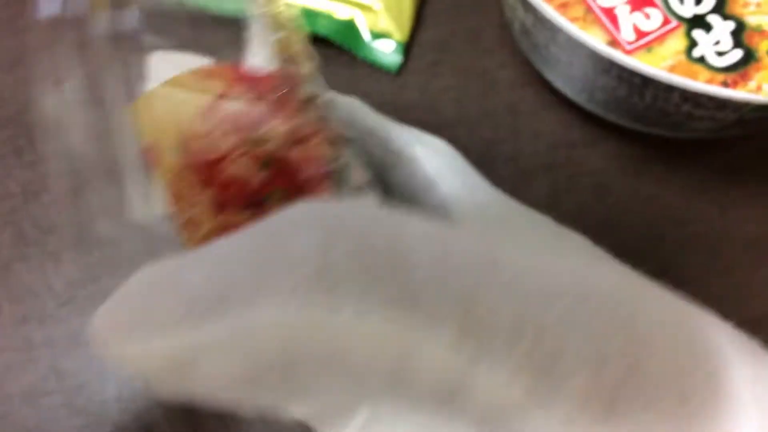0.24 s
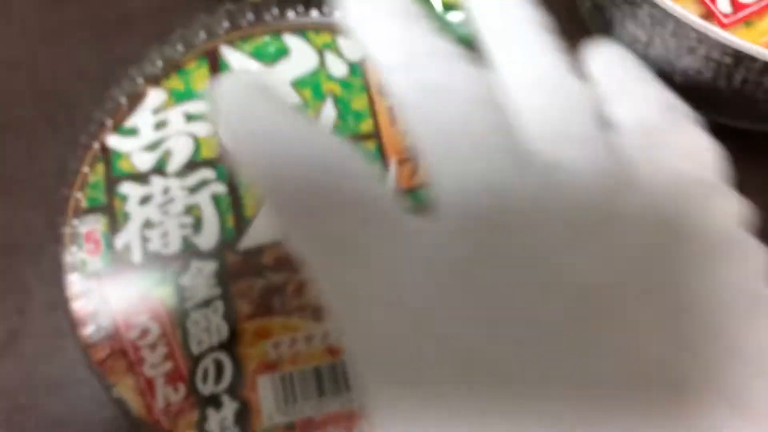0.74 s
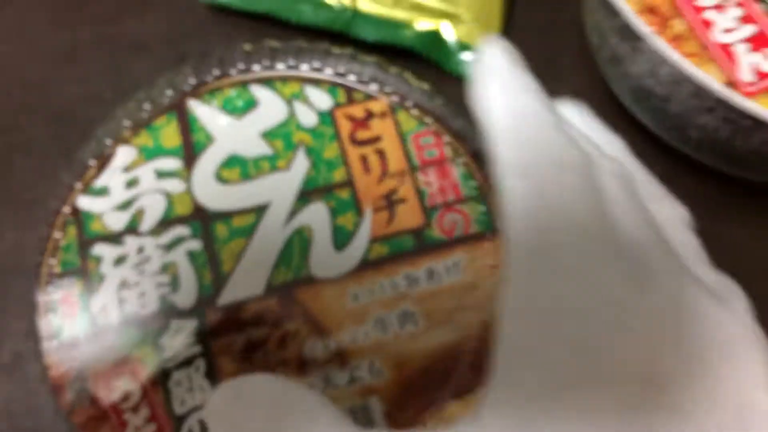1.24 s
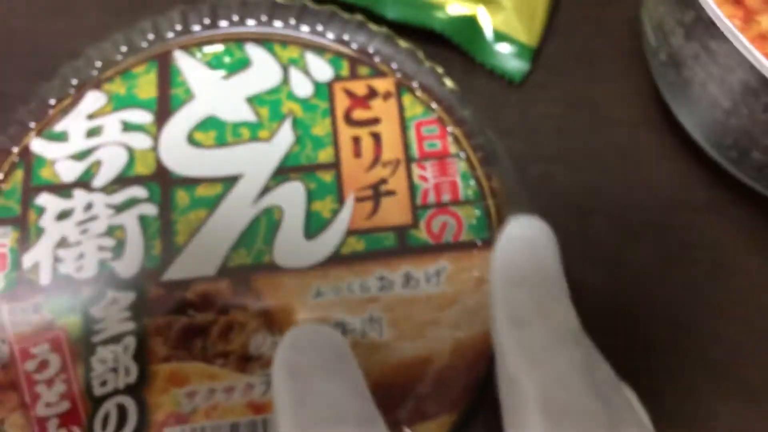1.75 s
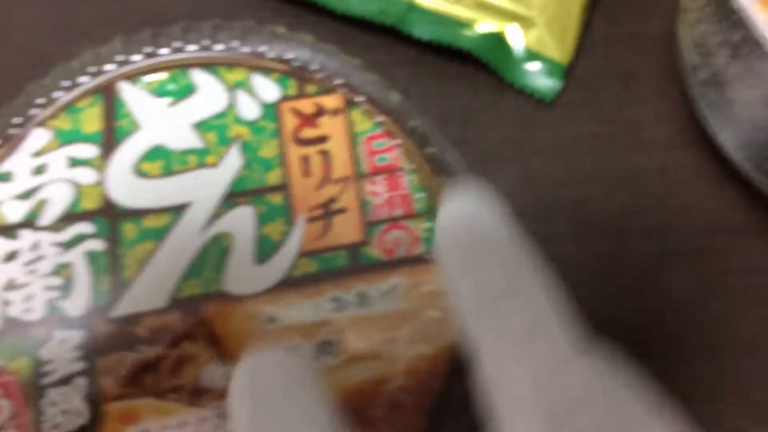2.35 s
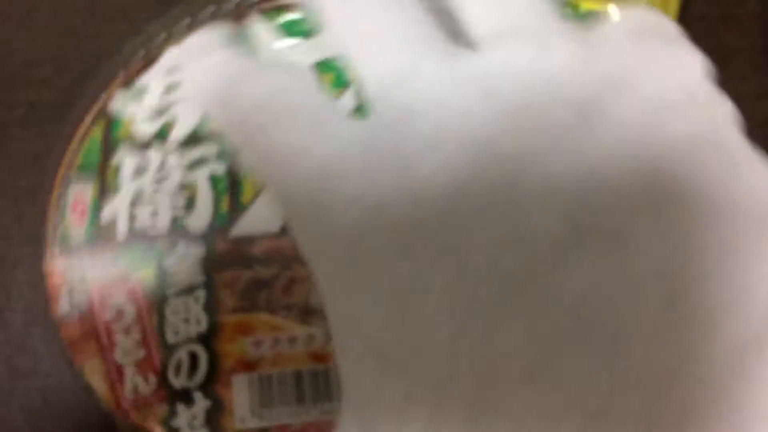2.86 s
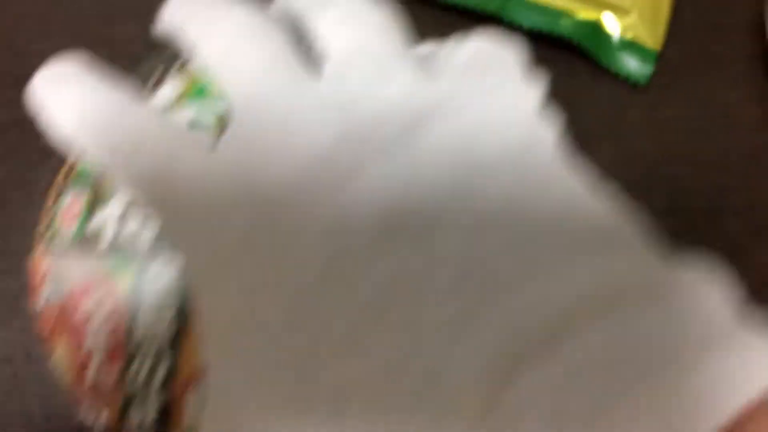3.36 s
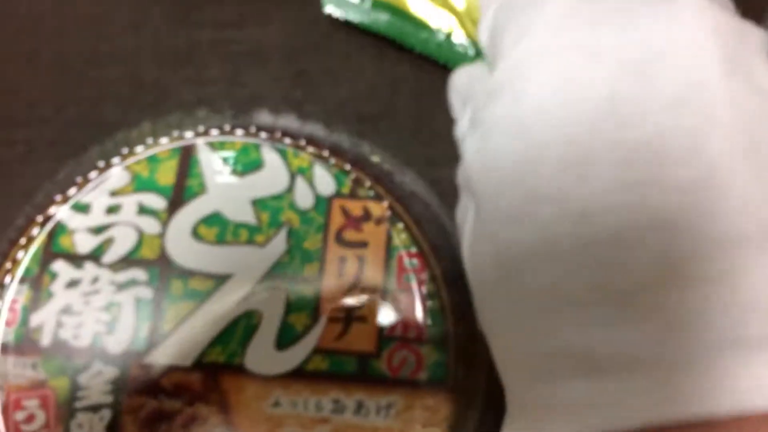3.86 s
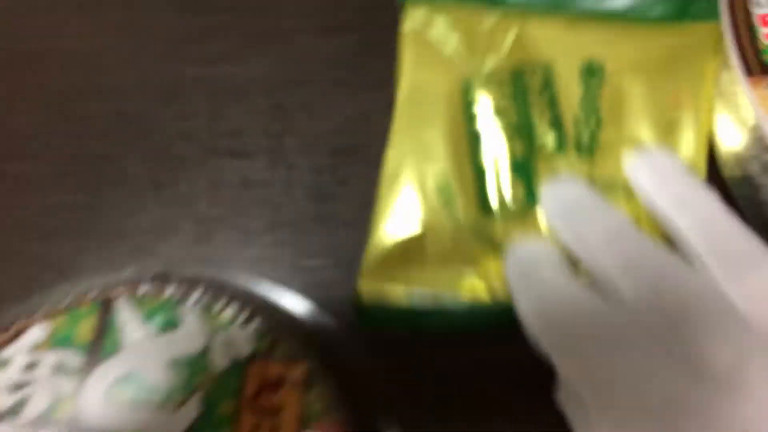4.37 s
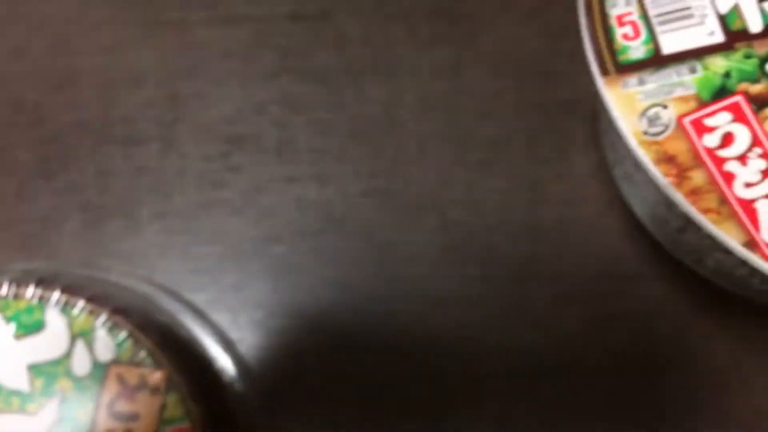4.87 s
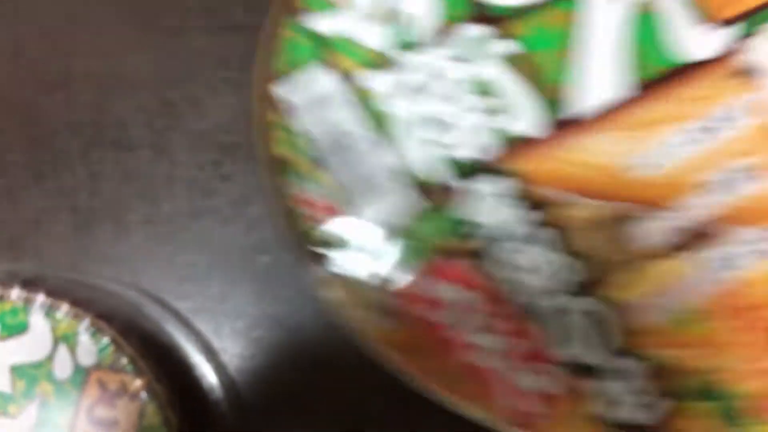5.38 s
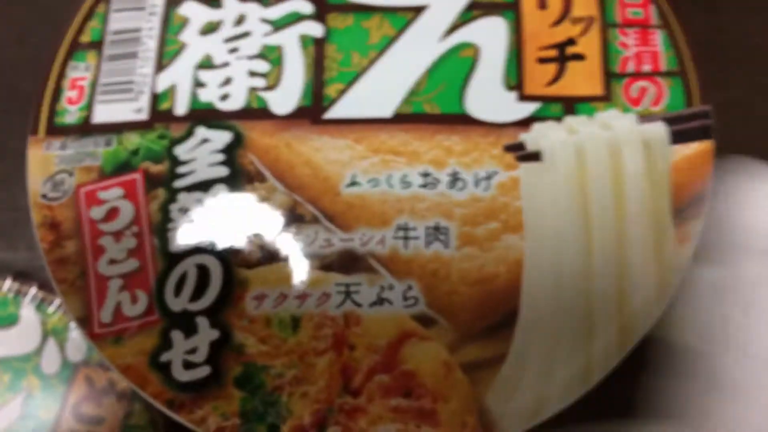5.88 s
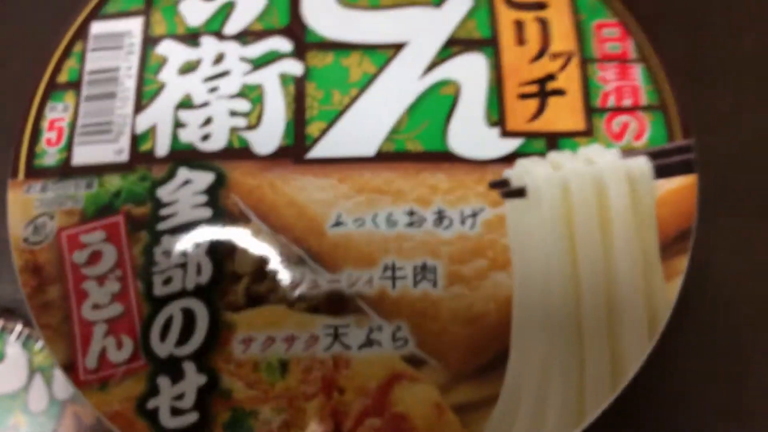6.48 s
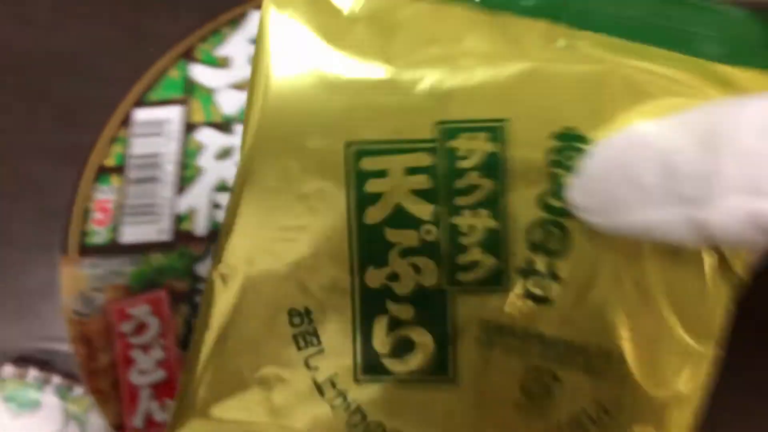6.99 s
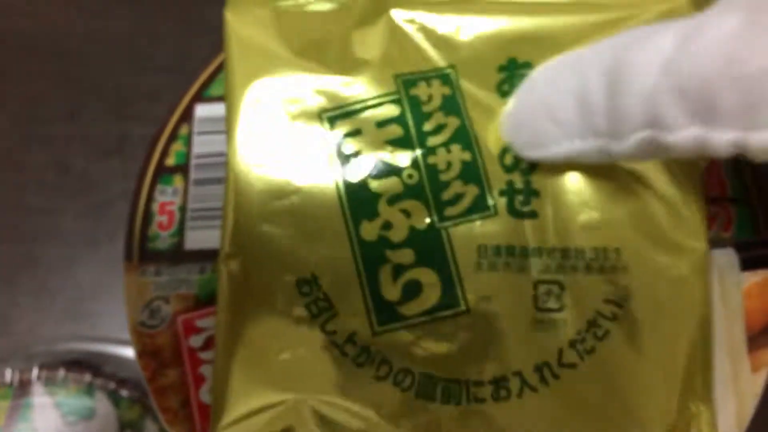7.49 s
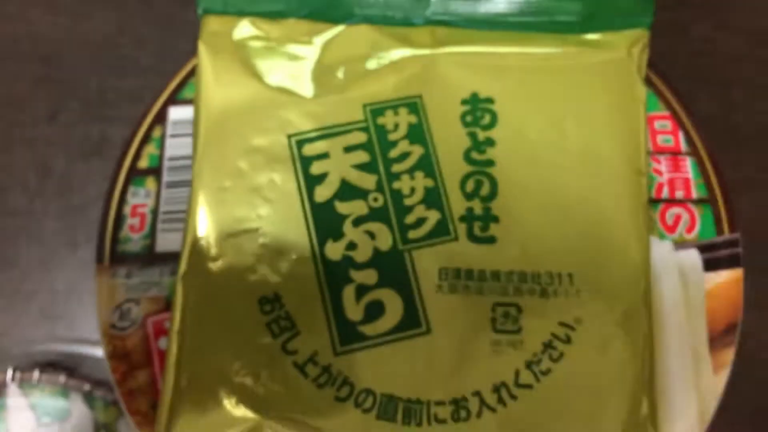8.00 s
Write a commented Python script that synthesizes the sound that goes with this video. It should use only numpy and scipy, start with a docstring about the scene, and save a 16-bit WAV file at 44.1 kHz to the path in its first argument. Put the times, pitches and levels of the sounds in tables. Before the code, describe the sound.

A lidded noodle cup clunks down and is rubbed by gloved hands, then foil crackles and squeaks, a second cup knocks and slides, and foil crinkles again.

```python
"""Noodle cups and a foil sachet

Gloved hands set down and stroke a lidded noodle cup, drag a squeaking foil sachet over the table, knock a second
cup into place and lay the crackling sachet on top. Blows ring cup walls over coloured noise; film and foil flip
in short pitched snaps; rubbing is grains of friction shaped by the hand's speed; the squeak is a wavering tone
with its octave. A small room answers, over steady ventilation and hum."""
import sys
import numpy as np
from scipy import signal
from scipy.fft import rfft, irfft
from scipy.io import wavfile
from scipy.ndimage import uniform_filter1d

SR = 44100
rng = np.random.default_rng(int(sys.argv[2]) if len(sys.argv) > 2 else 0)


def log_audio(samples):
    """Write samples as a 16-bit WAV file to the path given in sys.argv[1]."""
    # one column per channel
    frames = np.atleast_2d(samples).T
    # limit to full scale, then quantise
    limited = np.clip(frames, -1, 1)
    pcm = np.round(limited * 32767).astype(np.int16)
    wavfile.write(sys.argv[1], SR, pcm)


N = 363560
T = np.arange(N) / SR
SIZE = 8192  # samples in one hit or filter
AGE = np.arange(SIZE) / SR  # seconds since a hit
FREQS = np.maximum(np.fft.rfftfreq(SIZE, 1 / SR), 1)


def undb(db):
    """Decibels to gain."""
    return 10 ** (np.asarray(db) / 20)


def unit(x):
    """Scale to rms 1."""
    return x / np.sqrt(np.mean(x ** 2))


def fade(t60):
    """A decay that loses 60 dB in t60 seconds."""
    return np.exp(-np.log(1000) * AGE / max(t60, 1e-4))


def contour(points):
    """(Hz, dB) points as dB over all frequencies."""
    hz, db = np.transpose(points)
    return np.interp(np.log(FREQS), np.log(hz), db)


def colour(x, db):
    """Causal (minimum-phase) filter with the given gain in dB, made by folding the cepstrum."""
    cepstrum = irfft(db * np.log(10) / 20)
    cepstrum[1:SIZE // 2] *= 2
    cepstrum[SIZE // 2 + 1:] = 0
    response = irfft(np.exp(rfft(cepstrum)))
    return signal.fftconvolve(x, response)[:len(x)]


def resonances(modes):
    """Gain over all frequencies of some (Hz, width in Hz, dB) resonances."""
    return sum(undb(db) / np.hypot(1, 2 * (FREQS - hz) / width) for hz, width, db in modes)


def walk(rate):
    """Smooth random wander with a spread near 1, taking `rate` new values per second."""
    return unit(np.interp(T * rate, np.arange(N // 10), rng.standard_normal(N // 10)))


def grains(per_s, spread_db):
    """Random tiny slips of very unequal size."""
    hit = rng.random(N) < per_s / SR
    sign = rng.choice([-1, 1], N)
    size = undb(spread_db * np.minimum(rng.exponential(size=N), 4))
    return unit(hit * sign * size)


def swell(curve, axis):
    """Gain over time from one dB column of a curve; silent outside it."""
    rows = np.array(curve)
    gain = np.interp(T, rows[:, 0], undb(rows[:, axis]), 0, 0)
    return uniform_filter1d(gain, SR // 200)


def gestures(table, axis, ends_db, taper=1.29):
    """Gain over time of rubbing moves that set in, speed up, peak and come to rest; overlaps add in power."""
    power = np.zeros(N)
    for row in table:
        s, rise_s, fall_s = row[:3]
        times = [s - taper * rise_s, s - rise_s, s, s + fall_s, s + taper * fall_s]
        speed = np.interp(T, times, [0, undb(ends_db), 1, undb(ends_db), 0])
        power += (undb(row[axis]) * speed) ** 2
    return uniform_filter1d(np.sqrt(power), SR // 200)


def add(track, s, sound):
    """Mix a sound into the track at time s."""
    i = int(s * SR)
    track[i:i + len(sound)] += sound[:N - i]


def attack_level(sound, db, size):
    """Scale a hit so that its first samples have the given rms level."""
    return sound * undb(db) / np.sqrt(np.mean(sound[:size] ** 2))


def note(hz, ring_s):
    """A damped tone that swells over its first cycles."""
    return unit(np.sin(2 * np.pi * hz * AGE) * (fade(ring_s) - fade(ring_s / 6)))


def snaps(table, edges_db, ring_s, tail_s, tail_db, width, sheet_db, below_db, above_db, creep_db, gain_db):
    """A facet of film creeps, then flips: an impulse, a brief ring at its pitch, a shiver of the sheet."""
    out = np.zeros(N)
    treble = contour([(1000, -7.5), (7000, 0), (16000, -15.0)])
    radiation = contour([(30, -42), (100, -11.5), (500, -2.5), (1000, 3.0), (16000, 1.0)])
    for (s, db, hz), edge_db in zip(table, edges_db):
        flip, shiver, creep = rng.standard_normal((3, SIZE))
        push = flip * fade(ring_s) + undb(tail_db) * shiver * fade(tail_s)
        push[0] += 4  # the impulse

        # a peak at the facet's pitch, sheet slopes in dB per octave on either side, and a treble edge
        octaves = np.log2(FREQS / hz)
        facet = 1 / (1 + (octaves / width) ** 2)
        sheet = sheet_db - np.where(octaves < 0, below_db, above_db) * np.abs(octaves)
        power = facet ** 2 + undb(sheet) ** 2 + undb(treble + edge_db) ** 2
        shape = 10 * np.log10(power) + radiation

        add(out, s, attack_level(colour(push, shape), db + gain_db, size=180))
        # the creep is a decay played backwards, ending at the flip
        build_up = attack_level(colour(creep * fade(0.003), shape), db + creep_db, size=180)[::-1]
        add(out, s - SIZE / SR, build_up)
    return out


def knocks(table, modes, body, ring_at_500_s, ring_slope, modes_db, note_db, below_db,
           thump_hz, thump_s, thump_db, gain_db):
    """A blow rings the cup's walls while its contents rattle; a soft contact excites only the low modes
    and leaves more of the hollow thump. Low notes ring longer."""
    out = np.zeros(N)
    walls = np.zeros(SIZE)
    for k, (hz, width, db) in enumerate(modes):
        ring = np.sin(2 * np.pi * hz * AGE) * np.exp(-np.pi * width * AGE)
        walls += (-1) ** k * undb(db) * np.sqrt(width) * ring  # neighbours in opposite phase
    walls = unit(walls)
    for s, db, hz, contact_hz in table:
        ring_s = ring_at_500_s * (500 / hz) ** ring_slope
        decay = fade(ring_s / 2) + 0.37 * fade(ring_s)
        rattle = unit(colour(rng.standard_normal(SIZE) * decay, contour(body)))
        contact = -10 * np.log10(1 + (FREQS / contact_hz) ** 6)
        contact -= below_db * np.maximum(np.log2(hz / FREQS), 0)

        blow = unit(colour(rattle + undb(modes_db) * walls * fade(4 * ring_s), contact))
        main_note = undb(note_db) * (400 / hz) ** 0.88 * note(hz, ring_s)
        thump = undb(thump_db) * 1000 / contact_hz * note(thump_hz, thump_s)
        blow = blow + main_note + thump
        # the level is that of the energy spread over 8.4 ms
        add(out, s, blow * undb(db + gain_db) * np.sqrt(0.0084 * SR) / np.linalg.norm(blow))
    return out


# Colour of the ventilation. Each row: frequency in Hz, gain in dB.
AIR_COLOUR = [(15, -53), (25, -22), (49, -18), (114, -7), (134, -10), (195, -5.5), (293, -13), (344, -6.5),
              (439, -12), (476, -15), (1440, -20.5), (2690, -23), (3080, -28), (3920, -30), (16000, -48)]
AIR_DB, AIR_WANDER_DB = -53.37, 0.5
HUM_HZ, HUM_DB = 61, -63.5  # rms level


def room_tone():
    """Steady ventilation noise with a duct resonance, and mains hum as a pure tone."""
    duct = 1.3 * np.exp(-((FREQS - 350) / 45) ** 2)
    air = unit(colour(rng.standard_normal(N), contour(AIR_COLOUR) + duct))
    air = air * undb(AIR_DB + AIR_WANDER_DB * walk(11))
    hum = undb(HUM_DB) * np.sqrt(2) * np.sin(2 * np.pi * HUM_HZ * T)
    return air + hum


# Clicks of the thin lid. Each row: start in seconds, attack level in dB, pitch in Hz.
LID_CLICKS = [(0.3109, -34.5, 2060), (0.313, -36.5, 2020), (0.462, -38.5, 1310), (0.496, -39, 1230),
              (0.5964, -33.5, 1200), (0.62, -35, 1230), (0.6263, -36, 1120), (0.642, -23, 1420),
              (0.6461, -23, 1000), (0.6567, -20, 1300), (0.6871, -24, 2100), (0.711, -28.5, 4240),
              (1.6333, -36, 1930), (3.3769, -30, 6300), (3.384, -25.5, 3600)]


def lid(edge_db=-17, edge_db_per_oct=13, edge_per_db=3.44):
    """The lid's panels flip; high and hard clicks have the sharper edge."""
    edges = [edge_db + edge_db_per_oct * np.log2(hz / 3000) + edge_per_db * (db + 23) for _, db, hz in LID_CLICKS]
    return snaps(LID_CLICKS, edges, ring_s=0.008, tail_s=0.081, tail_db=-13.0, width=0.24,
                 sheet_db=0.0, below_db=1.0, above_db=13.0, creep_db=-7, gain_db=0)


# Glove strokes on the lid. Each row: fastest moment in seconds, rise in seconds, fall in seconds,
# level in dB, note of the touched panel in Hz.
STROKES = [(0.693, 0.061, 0.078, -31.5, 1800), (0.744, 0.01, 0.043, -38, 2660),
           (.79, 0.023, 0.049, -48, 2590), (1.17, 0.048, 0.073, -38.5, 2960),
           (1.633, 0.017, 0.016, -37, 2700), (1.69, .025, 0.063, -44.5, 1810),
           (1.79, 0.028, 0.073, -47.5, 2470), (1.878, 0.044, 0.23, -43, 2560),
           (2.179, 0.035, 0.083, -48.5, 2700), (2.285, 0.043, 0.058, -40, 2760),
           (2.388, 0.033, 0.043, -41, 2500), (2.75, 0.037, 0.048, -39.5, 1880),
           (2.835, 0.018, 0.015, -38.5, 2630), (2.874, 0.024, 0.03, -35.5, 2560),
           (2.975, 0.062, 0.046, -40, 4200), (3.041, 0.046, .041, -40, 2540),
           (3.375, 0.031, 0.024, -31.5, 3370), (3.456, 0.059, 0.089, -27, 3260)]
# Colours of the rasp and of the hollow drag. Each row: frequency in Hz, gain in dB.
STROKE_COLOUR = [(590, -34), (1000, -2), (1220, -14.5), (1470, -6.5), (1710, -1), (2280, -1.5), (2680, 0.5),
                 (3540, -4), (3930, -7.5), (4520, -6.5), (5500, -14), (11600, -18.5), (16000, -28)]
DRAG_COLOUR = [(53, -33), (90, -9.5), (124, -6.5), (365, -13), (416, -5), (599, -6.5), (715, -4.5),
               (1030, -14), (1230, -16.5), (1500, -19), (1950, -53), (3300, -120)]
# drag against rasp: DRAG_DB at a rise of LANDING_S seconds, more for each halving of the rise
DRAG_DB, DRAG_DB_PER_OCT, LANDING_S = -3, 5.5, 0.031


def strokes():
    """Cloth fibres catch and slip on the lid: a fine rasp that rings the touched panel, over the hollow note
    of the cup, which sounds the more the quicker the hand lands."""
    slips = grains(3000, 1.3) * undb(2 * walk(150))
    rasp = np.zeros(N)
    pressing = []
    for s, rise_s, fall_s, db, hz in STROKES:
        span = slice(int((s - rise_s) * SR), int((s + fall_s) * SR))
        panel = 7 / (1 + ((FREQS - hz) / 380) ** 2)
        speed = np.interp(T[span], [s - rise_s, s, s + fall_s], [.1, 1, .1])
        stroke = unit(colour(slips[span], contour(STROKE_COLOUR) + panel))
        add(rasp, s - rise_s, stroke * speed * undb(db))
        quickness = np.log2(LANDING_S / min(rise_s, .055))  # slower rises count as 55 ms
        pressing.append((s, rise_s, fall_s, db + DRAG_DB + DRAG_DB_PER_OCT * quickness))
    drag = unit(colour(grains(2500, 1.6), contour(DRAG_COLOUR)))
    return rasp + drag * gestures(pressing, axis=3, ends_db=-12)


# The lidded cup meets table and fingers. Each row: start in seconds, level in dB before the trim,
# main note in Hz, contact cut-off in Hz.
LID_KNOCKS = [(.642, -26.5, 1210, 6000), (.656, -15, 1047, 1930), (.663, -17, 800, 1210),
              (.71, -28.5, 760, 1210), (1.031, -37.5, 452, 890), (1.625, -33.5, 625, 2860),
              (1.638, -36, 690, 2200), (1.675, -35, 760, 1980), (2.82, -31.5, 660, 1090),
              (2.829, -28.5, 421, 910), (2.89, -33.5, 177, 600), (3.368, -30, 551, 1010),
              (3.428, -30, 610, 900), (3.524, -30, 404, 527), (3.84, -42, 400, 900)]
# Wall resonances of the lidded cup. Each row: frequency in Hz, width in Hz, relative level in dB.
LID_MODES = [(493, 18, 1), (773, 27, 2), (1070, 23, -14), (1440, 29, -22), (1850, 37, -6), (2350, 27, -2),
             (3050, 32, -24), (3220, 54, -18), (3570, 96, 15.5)]
# Broad colour of its rattle. Each row: frequency in Hz, gain in dB.
LID_BODY = [(35, -63.5), (60, -37), (354, -9.5), (732, -8), (1060, -2.5), (1280, -23), (1580, -8),
            (2000, -20), (3500, -10.5), (5720, -20), (6430, -15), (16000, -39)]


def first_cup():
    """The lidded cup is set down and touched: short rings over a low thump."""
    return knocks(LID_KNOCKS, LID_MODES, LID_BODY, ring_at_500_s=0.052, ring_slope=0.045, modes_db=-9.0,
                  note_db=5.5, below_db=2, thump_hz=110, thump_s=0.027, thump_db=-12.5, gain_db=0.5)


# Flexing of the foil. Each row: hardest moment in seconds, rise in seconds, fall in seconds,
# level of the fine crumple in dB before the trim.
FLEX = [(3.97, .12, 0.11, -45), (4.124, 0.068, 0.19, -40), (4.53, .19, .25, -39.5), (4.88, .06, .12, -41),
        (6.392, 0.094, .07, -38.5), (6.56, 0.13, 0.12, -37), (6.889, 0.15, .17, -47.5),
        (7.16, 0.085, .1, -47), (7.39, 0.028, 0.077, -54.5), (7.69, .14, .12, -48.5)]
# The sachet scrapes along. Each row: fastest moment in seconds, rise in seconds, fall in seconds,
# level in dB before body and hiss are balanced.
SCRAPES = [(4.335, 0.048, 0.079, -30.5), (4.405, .059, 0.15, -38), (4.61, 0.017, 0.013, -32.5),
           (4.685, 0.046, 0.03, -34), (4.77, 0.053, 0.079, -36), (4.9, 0.03, 0.013, -30.5),
           (6.217, 0.015, .025, -34), (7.43, 0.015, 0.014, -39), (7.53, 0.045, 0.03, -42.5),
           (7.76, 0.017, 0.031, -33.5)]
# Resonances of the air-filled packet. Each row: frequency in Hz, width in Hz, relative level in dB.
SACHET_MODES = [(636, 35, 5), (1674, 17, -6), (2140, 130, -3.5), (2430, 98, -4), (3370, 14, -20),
                (3450, 87, -2), (4940, 150, -6)]
# Colours of the scraped body, its hiss and the fine crumple. Each row: frequency in Hz, gain in dB.
SCRAPE_COLOUR = [(120, -39), (200, -6), (652, -6.5), (1430, 1.5), (1640, -6), (1790, -5), (3350, -8.5),
                 (6000, -16), (7800, -34), (13200, -120)]
HISS_COLOUR = [(1760, -31), (3000, 10), (4290, 2), (6760, 0), (8950, -6.5), (15000, -5), (16000, -18)]
CRUMPLE_COLOUR = [(180, -43), (300, -9), (440, -18), (603, -5.5), (1150, 3.5), (2100, 2), (4520, -3.5),
                  (11300, -9), (16000, -17)]
# hiss gain at a scrape of level HISS_AT_DB; extra dB per dB of harder scraping
HISS_DB, HISS_AT_DB, HISS_GROWTH = -6, -31, 0.27


def sachet():
    """Dragging rings the air-filled packet; flexing lets countless small creases give way in flurries."""
    ringing = 20 * np.log10(0.28 + resonances(SACHET_MODES))
    body = unit(colour(grains(3000, 4.4), contour(SCRAPE_COLOUR) + ringing))
    hiss = unit(colour(grains(3000, 4.2), contour(HISS_COLOUR)))
    speed = gestures(SCRAPES, axis=3, ends_db=-9.5)
    hiss_gain = undb(HISS_DB) * (speed / undb(HISS_AT_DB) + 1e-6) ** HISS_GROWTH
    scraping = speed * (undb(-1.5) * body + hiss_gain * hiss)

    crumple = np.zeros(N)
    for hz in np.geomspace(1200, 11000, num=7):  # facets of seven sizes, each with its own pitch and flurries
        facet = -14 * np.abs(np.log2(FREQS / hz))
        ticks = grains(220, 4) + .35 * rng.standard_normal(N)
        crumple += colour(ticks, contour(CRUMPLE_COLOUR) + facet) * undb(3.1 * walk(70))
    flutter = undb(-3.5 + 0.66 * walk(50))
    return scraping + flutter * unit(crumple) * gestures(FLEX, axis=3, ends_db=-7)


# most creases per second of flexing; level in dB before the foil's trim, and its spread; pitch and spread
SMALL_PER_S, SMALL_DB, SMALL_SPREAD_DB, SMALL_HZ, SMALL_SPREAD_OCT = 30, -41, 3.5, 3300, .75
SMALL_FOLLOW = 0.64  # dB of crease per dB of flexing


def small_creases(count=20):
    """Lesser creases scattered around the height of each flex; harder flexing makes them louder."""
    rows = []
    for s, rise_s, fall_s, db in FLEX:
        place, strength, size = np.clip(rng.standard_normal((count, 3)), -2, 2).T
        times = s + place / 2.5 * np.where(place < 0, rise_s, fall_s)
        levels = SMALL_DB + SMALL_FOLLOW * (db + 43.5) + SMALL_SPREAD_DB * strength
        pitches = SMALL_HZ * 2 ** (SMALL_SPREAD_OCT * size)
        rows += list(zip(times, levels, pitches))[:int(SMALL_PER_S * (rise_s + fall_s))]
    return rows


# Loudest creases of the buckling foil. Each row: start in seconds, attack level in dB before the trim,
# pitch of the facet in Hz.
CREASES = [(3.9323, -25.5, 2450), (3.9397, -28.5, 4600), (3.9717, -27, 1900), (3.9903, -32, 1550),
           (4.0135, -30.5, 1500), (4.0247, -34, 1410), (4.0813, -33, 2010), (4.1121, -30, 2000),
           (4.1193, -18, 3470), (4.1405, -24, 5340), (4.1461, -23, 3650), (4.1615, -30.5, 4440),
           (4.2048, -29, 3290), (4.2128, -29, 6120), (4.2237, -25, 3900), (4.2363, -32, 6460),
           (4.2655, -34, 3320), (4.2954, -27, 3950), (4.3239, -22, 3700), (4.3426, -33, 6000),
           (4.3685, -29, 8400), (4.511, -29.5, 6700), (4.5323, -28.5, 4690), (4.5551, -29.5, 3570),
           (4.5793, -31, 1460), (4.6478, -24.5, 2020), (4.6768, -29, 2240), (4.7099, -29, 6200),
           (4.7768, -31.5, 3140), (4.855, -30, 3170), (4.8938, -25.5, 2560), (4.9338, -29, 5730),
           (4.9511, -27.5, 2310), (5.0059, -30.2, 3400), (5.0356, -32, 3400), (5.8547, -32.5, 4030),
           (6.2607, -29, 2230), (6.3298, -29.5, 2200), (6.3466, -32, 5940), (6.3555, -34, 2280),
           (6.3912, -28, 2713), (6.4157, -26.5, 1900), (6.461, -29.5, 2330), (6.4728, -25, 2200),
           (6.4838, -30.5, 3060), (6.5195, -27, 1850), (6.5265, -29, 5080), (6.5471, -27.5, 6050),
           (6.5588, -30, 3500), (6.5744, -26.5, 1900), (6.6179, -33.5, 5250), (6.6329, -31.5, 5200),
           (6.7065, -28.5, 3220), (6.7659, -32.5, 2070), (6.7956, -31, 2244), (6.8029, -35, 4115),
           (6.8599, -32.5, 2260), (6.9121, -32, 2176), (6.9243, -38, 4420), (6.9458, -36, 1700),
           (7.0568, -35.5, 1400), (7.1404, -31, 3113), (7.1504, -28, 1370), (7.1733, -31.5, 3400),
           (7.2027, -31, 3350), (7.218, -28, 7300), (7.222, -27.5, 4260), (7.2605, -23.5, 2100),
           (7.2812, -23.5, 4360), (7.4495, -30.5, 1920), (7.5815, -30.5, 4100), (7.5972, -25, 6300),
           (7.789, -25, 1720), (7.8114, -27.5, 2130), (7.8464, -27, 3350), (7.9351, -24, 4050)]
# treble edge of a 3 kHz crease, its rise per octave, what a taut foil adds, and the flex level that is fully taut
EDGE_DB, EDGE_DB_PER_OCT, TAUT_EDGE_DB, TAUT_DB = -28, 9, 23, -38


def foil():
    """Creases of the sachet buckle, large and small; small facets and a taut foil give a sharper edge."""
    rows = CREASES + small_creases()
    taut = np.minimum(gestures(FLEX, axis=3, ends_db=-8) / undb(TAUT_DB), 1)
    edges = [EDGE_DB + EDGE_DB_PER_OCT * np.log2(hz / 3000) + TAUT_EDGE_DB * taut[int(s * SR)] for s, _, hz in rows]
    return snaps(rows, edges, ring_s=0.0063, tail_s=0.025, tail_db=-8.0, width=0.19,
                 sheet_db=-8.5, below_db=-0.5, above_db=5.5, creep_db=-19.5, gain_db=0.5)


# The foil squeaks on the table. Each row: time in seconds, slip rate in Hz, gain of the tone in dB,
# gain of its octave in dB, both before the flutter.
SQUEAK = [(4.305, 1699, -57, -56), (4.33, 1703, -34, -32), (4.37, 1680, -40, -35.5),
          (4.405, 1698, -35, -42), (4.43, 1670, -44, -37), (4.448, 1730, -39, -30.5),
          (4.47, 1730, -40, -60)]


def squeak():
    """Stick-slip of foil on the table top: a wavering tone with a strong octave."""
    s, hz = np.transpose(SQUEAK)[:2]
    slip_rate = np.interp(T, s, hz) * (1 + 0.0068 * walk(300))
    phase = 2 * np.pi * np.cumsum(slip_rate) / SR
    octave = np.sin(2 * phase) + undb(-22) * np.sin(4 * phase)
    tone = np.sin(phase) * swell(SQUEAK, axis=2) + octave * swell(SQUEAK, axis=3)
    return tone * undb(-0.5 + 2.8 * walk(70))


# The second cup is bumped, set down and tapped. Each row: start in seconds, level in dB before the trim,
# main note in Hz, contact cut-off in Hz.
CUP_KNOCKS = [(4.868, -33.5, 417, 700), (4.957, -36, 176, 700), (5.149, -36, 680, 3000),
              (5.156, -22.5, 292, 2200), (5.165, -19.5, 647, 2600), (5.177, -13, 1920, 2730),
              (5.2252, -9.5, 3090, 5230), (5.233, -16.5, 620, 3000), (5.304, -36.5, 290, 920),
              (5.847, -37, 385, 520), (5.927, -27.5, 594, 730), (6.106, -26.5, 149, 405),
              (6.211, -28.5, 475, 1780), (7.181, -19.5, 450, 2810), (7.184, -25.5, 194, 604),
              (7.187, -17.5, 1136, 2800), (7.749, -22, 1490, 1840)]
# Wall resonances of the second cup. Each row: frequency in Hz, width in Hz, relative level in dB.
CUP_MODES = [(188, 69, -12.5), (301, 7.5, 6), (436, 14, 3), (515, 35, -4), (615, 37, -4.5), (724, 33, -7.5),
             (778, 71, 8.5), (1510, 160, -14), (1815, 50, 7.5), (1940, 24, -11), (2057, 45, -3),
             (2660, 70, -4.5), (2850, 64, -10), (2980, 70, -21), (3305, 110, 1.5), (3660, 62, -13)]
# Broad colour of its rattle. Each row: frequency in Hz, gain in dB.
CUP_BODY = [(35, -58), (60, -10.5), (287, -3.5), (469, -3.5), (621, -1), (682, -5.5), (749, -3),
            (1170, -14), (1470, -3), (2050, -4), (2350, -15.5), (3270, -7.5), (4970, -20.5), (6580, -15.5),
            (16000, -38)]


def second_cup():
    """The second cup is knocked into place: stronger wall rings and a longer thump."""
    return knocks(CUP_KNOCKS, CUP_MODES, CUP_BODY, ring_at_500_s=0.053, ring_slope=0.14, modes_db=-0.5,
                  note_db=-3, below_db=3.5, thump_hz=185, thump_s=0.081, thump_db=-7.5, gain_db=-0.83)


# The second cup is pushed over the table. Each row: fastest moment in seconds, rise in seconds,
# fall in seconds, grinding level in dB, hiss level in dB.
GLIDE = [(5.17, 0.021, 0.037, -45, -49), (5.26, 0.04, 0.18, -41, -45), (5.51, 0.092, 0.11, -46, -45.5),
         (5.67, 0.15, .14, -48.5, -53.5)]
# Colour of the sliding. Each row: frequency in Hz, gain in dB.
GLIDE_COLOUR = [(180, -41.5), (300, -21.5), (494, -6.5), (749, -7), (801, -5), (1230, -11.5), (1560, -4.5),
                (1720, -5.5), (3030, -1), (10700, -2), (16000, -8)]


def glide(split_hz=3500):
    """The wrapped cup slides across the table: its base grinds and the wrap hisses, each wavering on its own."""
    def friction(slope):
        side = -10 * np.log10(1 + (FREQS / split_hz) ** slope)
        return unit(colour(grains(7000, 3.5), contour(GLIDE_COLOUR) + side)) * undb(0.9 * walk(30))

    grind = friction(4)  # below the split
    hiss = friction(-4)  # above the split
    return grind * gestures(GLIDE, axis=3, ends_db=-7.5) + hiss * gestures(GLIDE, axis=4, ends_db=-13)


def room(x, t60=0.24, wet_db=-15, first_s=0.0121):
    """Nearby surfaces answer after a few metres of travel and die away quickly."""
    onset = np.clip((AGE - first_s) / 0.001, 0, 1)
    tail = rng.standard_normal(SIZE) * (fade(t60) + 2.5 * fade(0.083)) * onset
    tail = colour(tail, contour([(100, 4.5), (4000, -8.5), (16000, -3)]))
    return x + undb(wet_db) * signal.fftconvolve(x, tail / np.linalg.norm(tail))[:N]


def scene():
    """All the handling sounds in the room, over its steady tone."""
    first = lid() + strokes() + first_cup()
    packet = sachet() + foil() + squeak()
    second = second_cup() + glide()
    return (room(first + packet + second) + room_tone())[None]


def record(dry, top_hz=16000):
    """The recorder stops at full scale and cuts the top."""
    low_pass = signal.ellip(8, .2, 70, top_hz, fs=SR, output="sos")
    return signal.sosfilt(low_pass, np.clip(dry, -1, 1))


dry = scene()
out = record(dry)
log_audio(out)
```